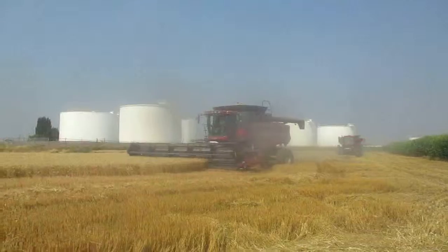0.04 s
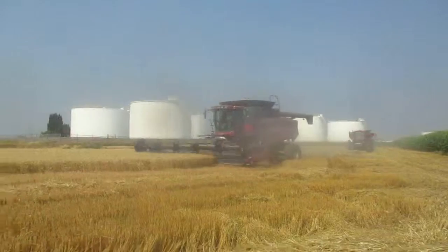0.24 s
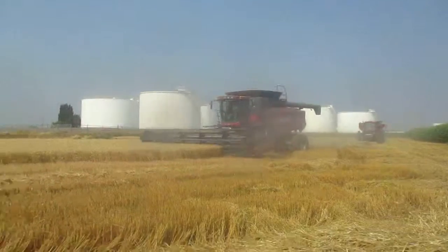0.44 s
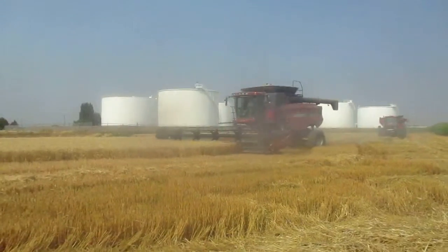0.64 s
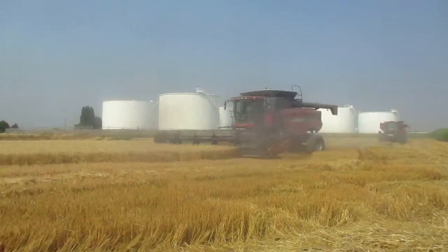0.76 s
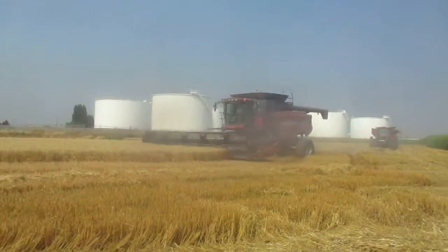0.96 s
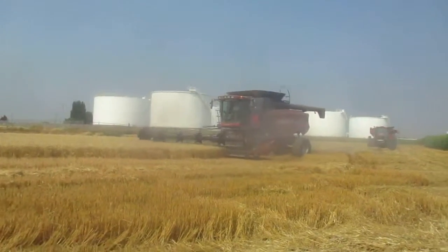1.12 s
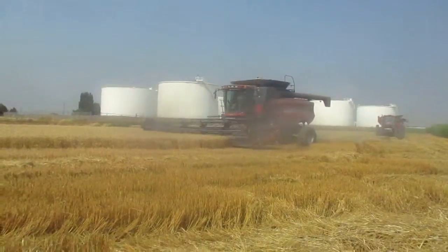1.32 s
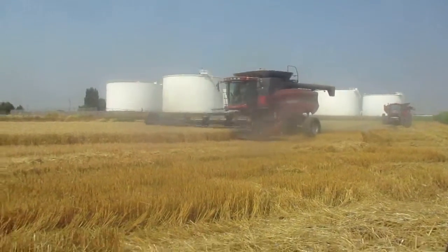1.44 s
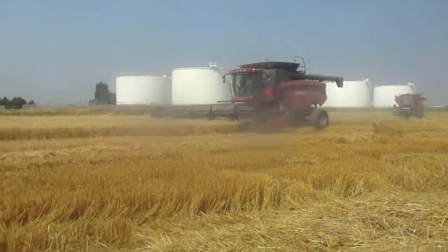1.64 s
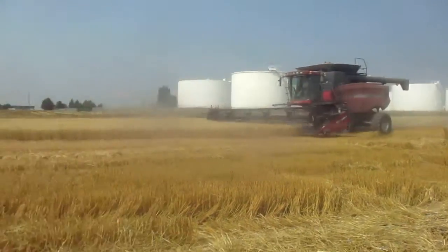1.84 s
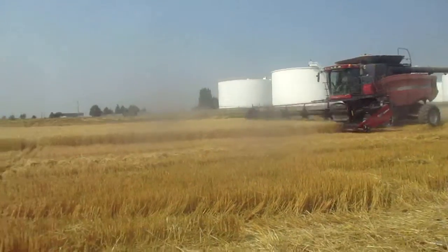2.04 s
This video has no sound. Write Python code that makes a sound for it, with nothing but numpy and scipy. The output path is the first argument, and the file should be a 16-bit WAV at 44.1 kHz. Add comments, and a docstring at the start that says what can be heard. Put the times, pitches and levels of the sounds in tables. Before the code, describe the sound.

A combine harvester drones and roars across a field, with a wavering whine and wind.

```python
"""A six-cylinder diesel drones and knocks under a roar of threshing: a combine harvester cutting grain
across an open field, heard from a hand-held microphone in the stubble. Its drives whine, wavering in
the moving air. Wind buffets the microphone, and dry straw rustles and cracks close by. Out at the
machine the threshing drum swells to a hollow howl, and a second, thinner whine comes up."""
import sys
import numpy as np
from scipy import signal
from scipy.fft import rfft, irfft
from scipy.io import wavfile
from scipy.ndimage import map_coordinates

SR = 44100
rng = np.random.default_rng(int(sys.argv[2]) if len(sys.argv) > 2 else 0)


def file_out(sig):
    """Save sig as 16-bit WAV at sys.argv[1]."""
    # one column per channel
    cols = np.atleast_2d(sig).T
    # limit, then scale
    lim = np.clip(cols, -1, 1)
    pcm = np.round(lim * 32767).astype(np.int16)
    wavfile.write(sys.argv[1], SR, pcm)


N = 91772
T = np.arange(N) / SR
START_S, TOP_HZ = 0.207, 15700
FIRING_HZ, PUMP_HZ, TREBLE_HZ = 104.18, 2165, 445

# The diesel's cylinders in firing order. Each entry: relative strength in dB.
CYLINDERS = [3.5, 1.4, -3.5, -4, 1.5, 0.61]
# Tone of the exhaust, combustion knock and threshing. Each row: frequency in Hz, relative gain in dB.
EXHAUST_COLOUR = [(30, -30), (70, 0), (104, 6.5), (160, 8.5), (270, 3.5), (400, -15), (750, -22),
                  (1100, -28), (3000, -38), (9000, -85)]
KNOCK_COLOUR = [(200, -13), (450, 5.5), (750, -2.5), (1100, 5), (2000, -21.5), (3000, -8), (6000, -32),
                (15000, -60)]
ROAR_COLOUR = [(30, -20), (90, 4.5), (230, 4), (330, 1.5), (440, -7), (580, -1), (830, -7), (1020, -7.5),
               (1400, -7), (1750, -10.5), (2100, -10), (2450, -14.5), (3100, -15.5), (5500, -20),
               (8500, -26.5), (10700, -32), (12000, -35), (13400, -38), (15500, -45)]
# Tones that carry across the field. Each row: pitch in Hz, relative level in dB.
HUM_TONES = [(104.4, -25), (266.3, -34), (488, -41), (522.7, -35.5), (1410, -43.5)]  # the diesel's steady hum: its firing note and higher engine tones
WHINE_TONES = [(1732, -50.5), (2021, -35)]  # drives
DRONE_TONES = [(678, -38.5), (770, -38), (866.7, -36), (958, -43.5)]  # rotor and fans, in the midrange
# Reflections that reach the microphone. Each row: time in seconds, lag in ms, gain as a ratio.
GROUND_ECHO = [(.207, 1.54, 0.53), (.6, 1.46, 0.59), (1.0, 1.422, 0.33), (1.4, 1.34, 0.41),
               (1.7, 1.27, 0.39), (1.78, 1.165, 0.47), (1.9, 0.95, 0.3), (2.0, 1.04, 0.075)]  # the lag shrinks as the microphone moves
HAND_ECHO = [(1.72, .45, 0), (1.8, .45, .15), (1.92, .38, .25), (1.96, .31, .4), (2.0, .265, .7),
             (2.03, .21, .45), (2.08, .19, .28)]  # close, probably off the hand; sweeps upward as the microphone turns
HOLLOW_ECHO = [(1.68, 1.12, 0), (1.76, 1.0, -.28), (1.82, .88, -.4), (1.88, .73, -.46), (1.94, .53, -.36),
               (2.0, .39, -.3), (2.08, .33, -.2)]  # close and inverted; its notch rises with the same turn
# How each sound swells and sinks at the microphone. Each row: time in seconds, gain in dB.
MACHINE_LEVEL = [(.207, -6.5), (.3, -5.5), (.38, -2), (.62, -1.2), (.85, -1.5), (1.1, -1.5), (1.35, 2),
                 (1.73, 1.8), (1.82, -3), (1.92, -5), (2.08, -2.5)]  # diesel, hum and roar together
TREBLE_LEVEL = [(.207, 0), (.5, 1.5), (1.72, -1.5), (1.79, -1), (1.93, 0), (2.0, 1), (2.08, 3)]  # the roar above TREBLE_HZ
DRIVE_LEVEL = [(.207, -5), (.3, 0), (.42, -5), (.49, -12), (.61, 4.5), (.73, -1.5), (.86, 3.5),
               (1.06, -4.5), (1.15, 0), (1.24, -9), (1.33, 2), (1.39, -5.5), (1.53, 4), (1.6, -4),
               (1.68, 1), (1.79, -14), (1.89, -7), (1.96, -14), (2.08, -6)]
ROTOR_LEVEL = [(.207, -8.5), (.62, -1.5), (1.05, -3.5), (1.32, 2.5), (1.6, 3), (1.78, -3.5), (2.08, -11)]
WIND_LEVEL = [(.207, -27.5), (.29, -21.5), (.45, -24), (.74, -21), (.9, -26.5), (1.25, -25.5), (1.6, -23),
              (1.75, -16.5), (1.87, -19), (1.9, -33), (1.99, -20), (2.02, -29), (2.08, -27)]
RUSTLE_LEVEL = [(.207, -40.5), (.3, -39), (.41, -31.5), (.45, -37), (.51, -33), (.55, -49), (.75, -66),
                (.9, -70)]
HOWL_LEVEL = [(.207, -44), (.42, -31.5), (.62, -25), (.8, -30), (1.05, -29.5), (1.35, -28), (1.62, -27.5),
              (1.78, -31.5), (2.08, -35.5)]
PUMP_LEVEL = [(.207, -58), (.9, -48), (1.17, -41), (1.4, -43), (1.62, -40), (1.8, -51), (2.08, -46)]
# Tone of the wind and of the dry straw. Each row: frequency in Hz, relative gain in dB.
RUMBLE_COLOUR = [(15, -21), (35, -6.5), (70, 4), (150, -1.5), (290, -3.5), (450, -9), (900, -30.5),
                 (3000, -60)]
STRAW_COLOUR = [(1500, -8), (3500, 5), (6000, 2.5), (8700, 3.5), (9600, 0.5), (10700, 3.5), (12000, -5),
                (13400, -1), (14500, -12), (15500, -16)]
# Eddies on the microphone. Each row: centre in seconds, peak in dB, pitch in Hz, half length in seconds.
EDDIES = [(.298, -13, 150, .002), (0.772, -1.5, 78, 0.0047), (0.777, -7.5, 147, 0.0061),
          (0.786, -6.5, 280, 0.002), (0.847, -9, 170, 0.0015), (1.607, -8, 130, 0.0021),
          (1.627, -9.5, 237, 0.003), (1.731, -1.5, 245, 0.0022), (1.752, -2, 260, 0.0029),
          (1.782, -1.5, 165, 0.0028), (1.791, -5, 225, 0.004), (1.866, -3.5, 196, 0.0035),
          (1.876, -5.5, 274, 0.0044), (1.929, -5.5, 180, 0.001), (1.974, -7.5, 292, 0.0018),
          (1.982, -6, 194, 0.0042), (2.066, -11, 282, 0.0059)]
# Stalks cracking close by.
# Each row: start in seconds, level in dB, centre in Hz, sharpness as Q, decay in seconds.
STALK_CRACKS = [(.313, -40, 13000, 3, .007), (.398, -38, 13000, 3, .018), (0.518, -21, 5800, 1.6, .002),
                (0.5202, -21.5, 3500, 1.1, .003), (.531, -31, 7400, 3, .006), (.662, -19, 3100, 2.4, .003),
                (.6625, -31, 9500, 1, .003), (.6655, -26.5, 6000, .5, .004),
                (.665, -25, 10500, 7.2, 0.0044), (0.669, -21, 3480, 1.1, .003), (.670, -32, 10700, 3, .002),
                (.983, -35, 8700, 1.1, 0.0065), (1.14, -30, 4970, 2.5, .01), (1.531, -29, 11900, 1, 0.0016),
                (1.604, -17.5, 2700, 1.8, .005)]


def undb(db):
    """Decibels to gain."""
    return 10 ** (np.asarray(db) / 20)


def unit(x):
    """Scale to an rms of 1."""
    return x / np.sqrt(np.mean(x ** 2))


def curve(rows):
    """Gain over time from points in seconds and dB."""
    return undb(np.interp(T, *np.array(rows).T))


def noise():
    """White noise."""
    return rng.standard_normal(N)


def walk(rate):
    """A smooth random drift that changes about rate times a second; spread near 1."""
    return map_coordinates(rng.standard_normal(1024), [T * rate + 2], order=3, mode="wrap")


def colour(x, points):
    """Filter by points in Hz and dB; the result has an rms of 1."""
    hz, db = np.array(points).T
    bin_hz = np.maximum(np.fft.rfftfreq(N, 1 / SR), 1)
    gain = undb(np.interp(np.log(bin_hz), np.log(hz), db))
    return unit(irfft(rfft(x) * gain, N))


def resonate(x, hz, q):
    """Pass twice through one resonance; the result has an rms of 1."""
    warped = np.tan(np.pi * hz / SR)
    band = signal.bilinear([warped / q, 0], [1, warped / q, warped ** 2], fs=.5)
    return unit(signal.lfilter(*band, signal.lfilter(*band, x)))


def echo(x, rows, lag_share=1):
    """Add one slightly dull reflection whose lag and gain shift with the microphone."""
    times, lag_ms, gains = np.array(rows).T
    lag_s = lag_share * np.interp(T, times, lag_ms) / 1000
    gain = np.interp(T, times, gains)
    dull = signal.sosfiltfilt(signal.butter(1, 7000, fs=SR, output="sos"), x)
    reflection = map_coordinates(dull, [(T - lag_s) * SR], order=3, mode="mirror")
    return (x + gain * reflection) / np.hypot(1, gain)


def tones(shaft_s, rows, fade_db, scatter, flutter_hz):
    """Tones locked to a shaft; moving air over the field fades each one and scatters its phase."""
    out = 0
    for hz, db in rows:
        fade = undb(fade_db * walk(4.2))
        flutter = scatter * (walk(flutter_hz) + 1j * walk(flutter_hz)) / np.sqrt(2)
        tone = np.exp(2j * np.pi * hz * shaft_s)
        out = out + undb(db) * np.sqrt(2) * np.real(fade * (1 + flutter) * tone)
    return out


def diesel(shaft_s):
    """Each firing sends a pulse down the exhaust and a short knock through the block."""
    cycles = FIRING_HZ * shaft_s
    firing = cycles.astype(int)
    scatter_db = 2 * rng.standard_normal(512)[firing]
    strength = undb(np.take(CYLINDERS, firing, mode="wrap") + scatter_db)
    pulses = np.diff(firing, prepend=0) * strength
    exhaust = colour(pulses - pulses.mean(), EXHAUST_COLOUR)
    decay = np.exp(-(cycles % 1) / 0.42)
    knock = colour(noise() * strength * decay, KNOCK_COLOUR)
    return undb(-30) * exhaust, undb(-30.5) * knock


def threshing():
    """Roar of fans, rotor and sieves; each octave flickers a little as the crop feeds through."""
    spectrum = rfft(colour(noise(), ROAR_COLOUR))
    octave = np.log2(np.maximum(np.fft.rfftfreq(N, 1 / SR), 1))
    bands = (irfft(spectrum * np.maximum(1 - abs(octave - k), 0), N) for k in range(4, 15))
    return undb(-22) * sum(band * undb(1.15 * walk(18)) for band in bands)


def combine():
    """The distant machine runs off one unsteady crankshaft; its roar also arrives off the ground."""
    shaft_s = T + 0.001994 * np.cumsum(walk(4)) / SR  # time as the crankshaft keeps it
    exhaust, knock = diesel(shaft_s)
    hum = tones(shaft_s, HUM_TONES, fade_db=1, scatter=0.17, flutter_hz=14.02)
    drone = tones(shaft_s, DRONE_TONES, fade_db=1, scatter=.4, flutter_hz=25)
    deck = echo(threshing() + knock, GROUND_ECHO)
    # The threshing parts sit lower than the engine deck, so their echo follows sooner.
    underside = undb(-5) * echo(threshing(), GROUND_ECHO, lag_share=0.688)
    roar = echo(deck + underside, HAND_ECHO)
    roar = echo(roar, HOLLOW_ECHO)
    bass = signal.sosfiltfilt(signal.butter(2, TREBLE_HZ, fs=SR, output="sos"), roar)
    treble = curve(TREBLE_LEVEL) * (roar - bass)
    return curve(MACHINE_LEVEL) * (exhaust + hum + bass + treble) + curve(ROTOR_LEVEL) * drone


def drive_whine():
    """The drives whine across the field, their speed wandering a little."""
    drive_s = T + .0015 * np.cumsum(walk(9.33)) / SR
    return curve(DRIVE_LEVEL) * tones(drive_s, WHINE_TONES, fade_db=1.3, scatter=.5, flutter_hz=45.87)


def wind():
    """A lumpy rumble right on the microphone, with single eddies that thump for a cycle or two."""
    lumps = undb(2 * walk(70))
    out = curve(WIND_LEVEL) * colour(noise() * lumps, RUMBLE_COLOUR)
    for centre_s, db, hz, half_length_s in EDDIES:
        offset_s = T - centre_s
        swell = np.exp(-(offset_s / half_length_s) ** 2)
        out += undb(db) * swell * np.cos(2 * np.pi * (hz * offset_s + rng.random()))
    return out


def straw(clicks_per_s=5500, attack_s=.0003):
    """Dry stubble close by rustles in tiny uneven clicks; single stalks split at once and ring away."""
    clicks = (rng.random(N) < clicks_per_s / SR) * noise()
    sizes = undb(2 * np.minimum(rng.exponential(size=N), 4))
    out = curve(RUSTLE_LEVEL) * colour(clicks * sizes, STRAW_COLOUR)
    for start_s, db, hz, q, decay_s in STALK_CRACKS:
        age = np.maximum(T - start_s, 0)
        burst = np.minimum(age / attack_s, 1) * np.exp(-age / decay_s)
        out += undb(db) * burst * resonate(noise(), hz, q)
    return out


def drum_howl():
    """Air and crop sound a hollow resonance of the threshing drum, which swells and sinks."""
    return curve(HOWL_LEVEL) * resonate(noise(), hz=755, q=3.5)


def pump_whine():
    """A thin whine, probably hydraulic, in a narrow band of rasp that beats against the drives."""
    tone = tones(T, [(PUMP_HZ, 0)], fade_db=1.3, scatter=.5, flutter_hz=30.1)
    rasp = resonate(noise(), PUMP_HZ, q=8)
    return curve(PUMP_LEVEL) * (tone + rasp)


def scene():
    """The harvester far off, the wind and the straw close up, all on one microphone."""
    return (combine() + drive_whine() + wind() + straw() + drum_howl() + pump_whine())[None]


def record(dry):
    """The microphone opens abruptly and cuts the highest treble."""
    top_cut = signal.ellip(10, .2, 80, TOP_HZ, fs=SR, output="sos")
    return signal.sosfilt(top_cut, dry * (T >= START_S))


dry = scene()
out = record(dry)
file_out(out)
```